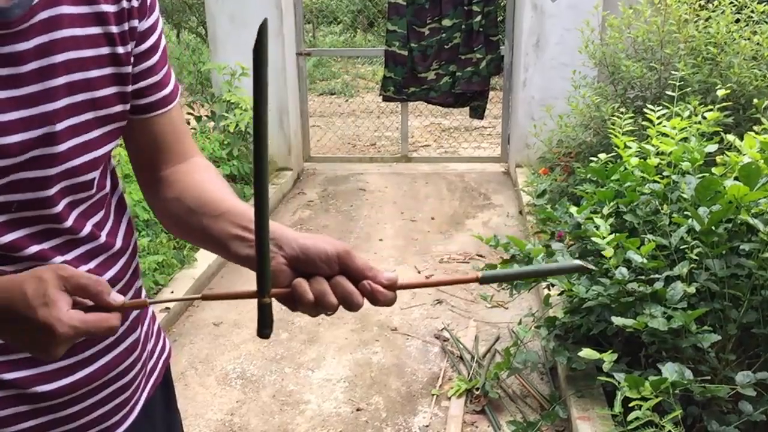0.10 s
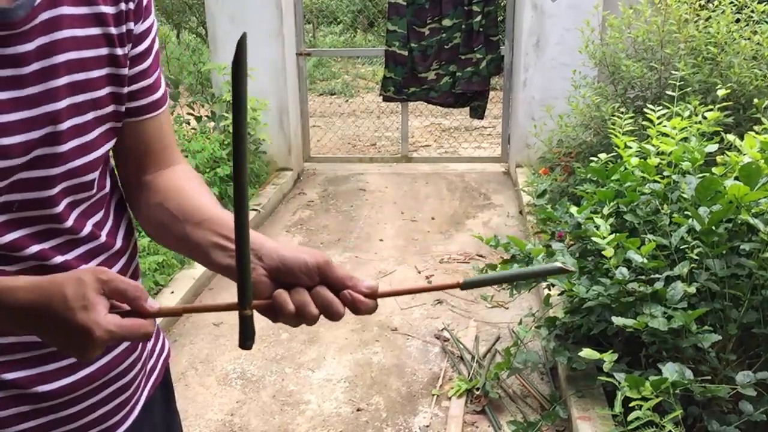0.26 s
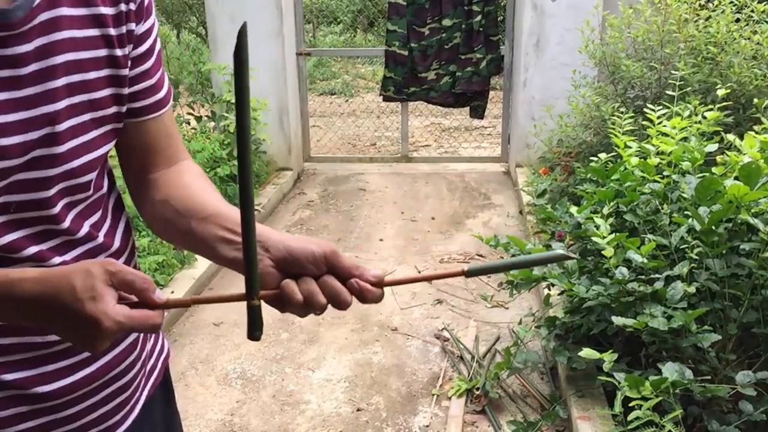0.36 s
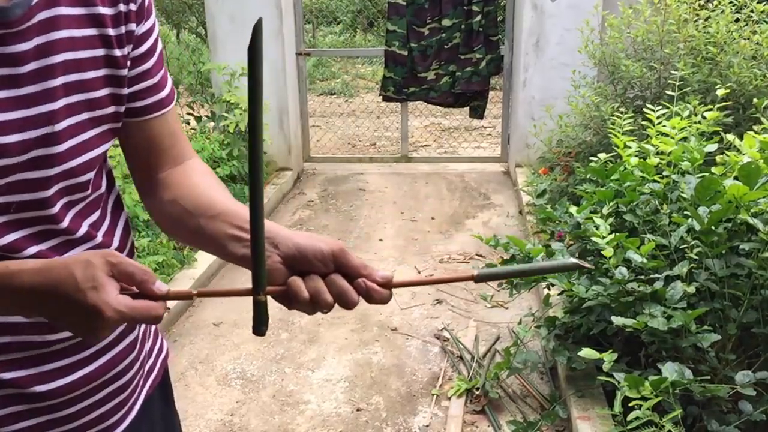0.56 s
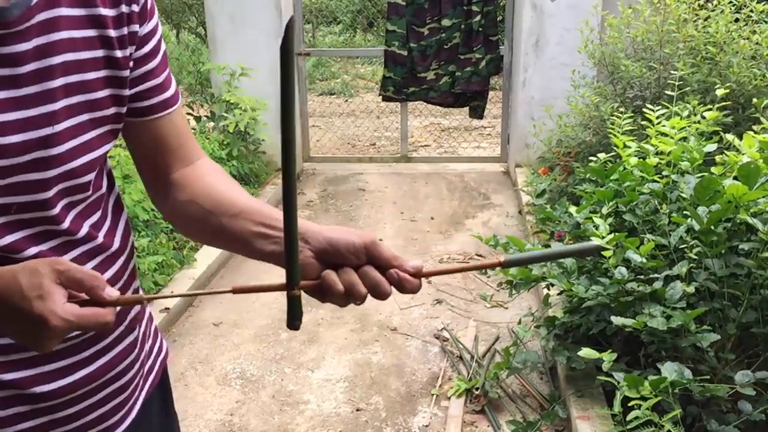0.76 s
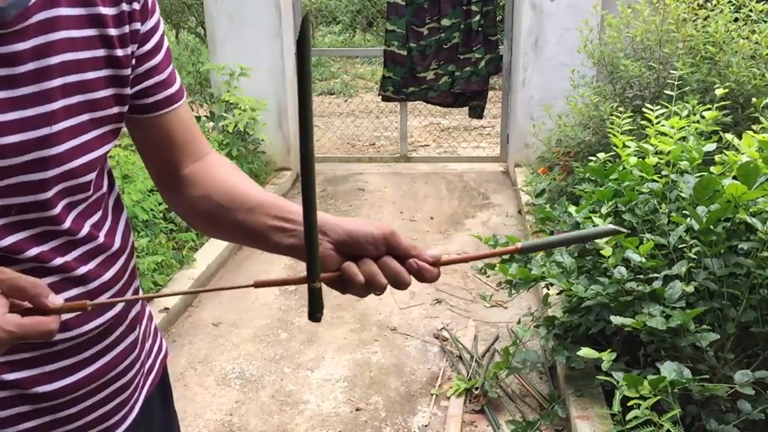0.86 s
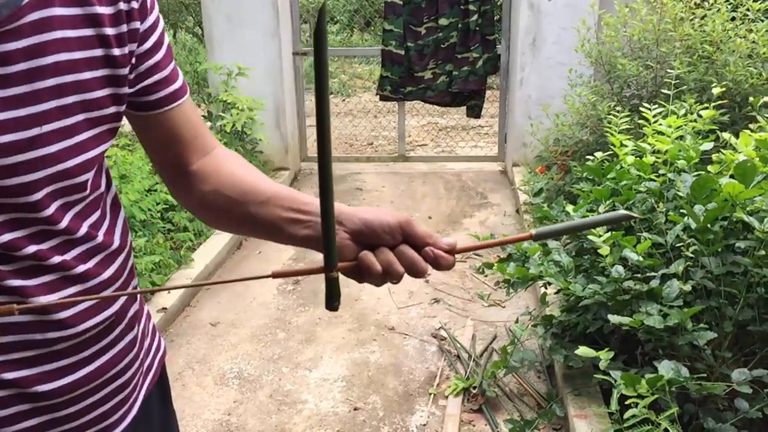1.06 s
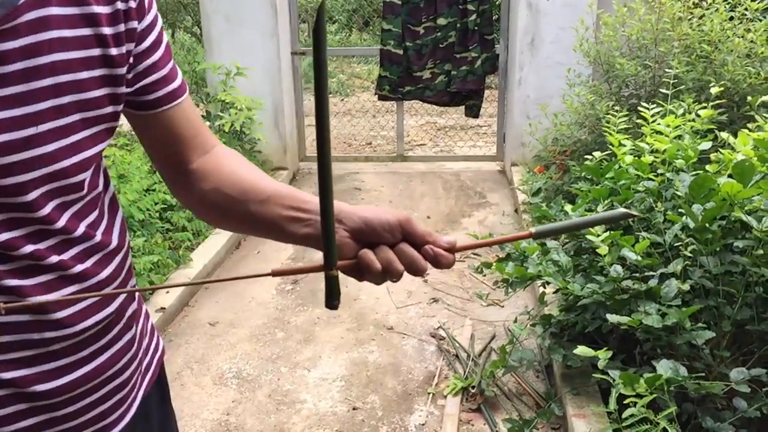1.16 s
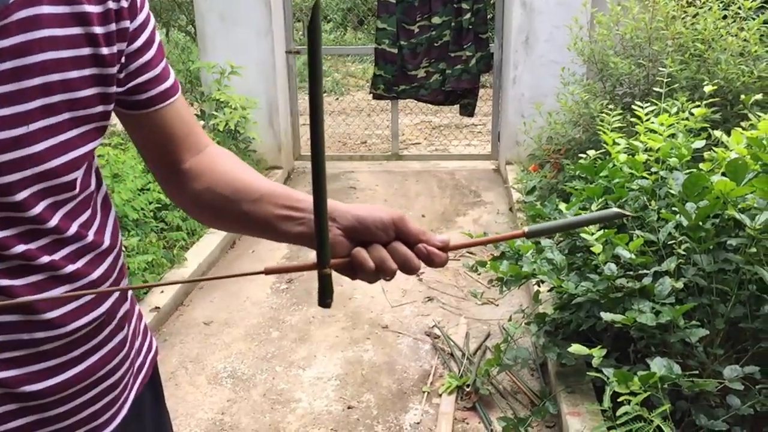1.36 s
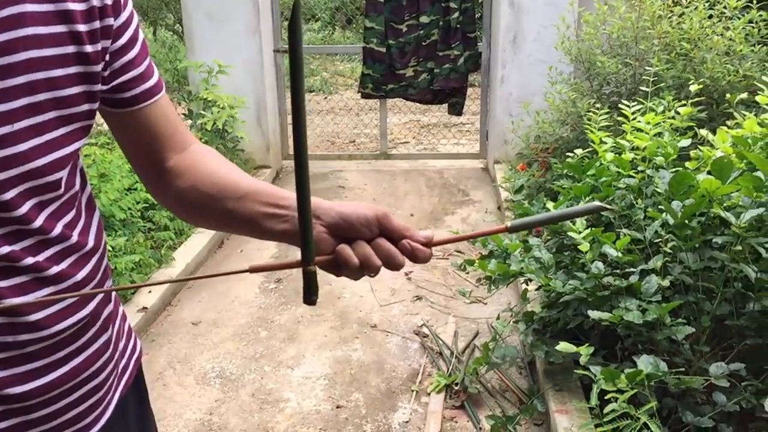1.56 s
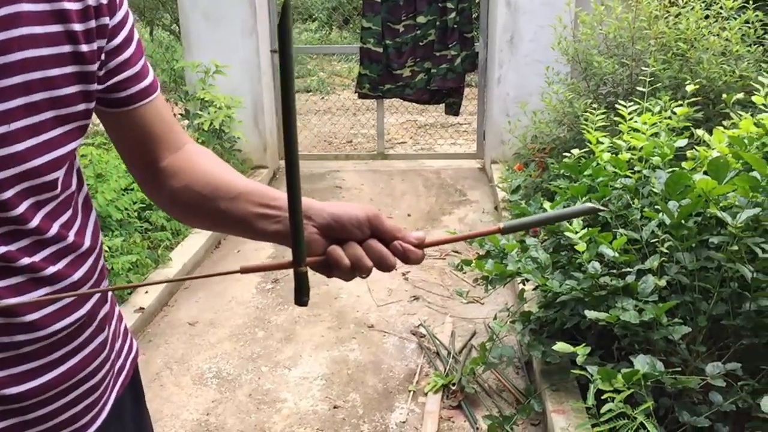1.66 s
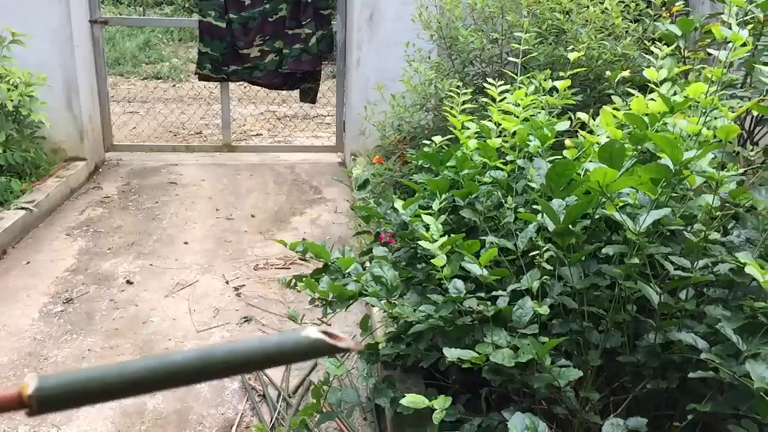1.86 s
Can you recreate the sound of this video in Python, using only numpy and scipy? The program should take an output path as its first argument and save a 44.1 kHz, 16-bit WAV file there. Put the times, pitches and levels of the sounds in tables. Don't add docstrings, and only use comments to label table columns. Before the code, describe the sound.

A bamboo pop gun rubs and creaks faintly, then bangs once, sharp and distorted, close to the microphone; slaps off the walls fade into a garden with thin crickets, soft breeze and a faint nasal plunger scrape.

```python
import sys
import numpy as np
from scipy import signal
from scipy.io import wavfile

SR = 44100
rng = np.random.default_rng(int(sys.argv[2]) if len(sys.argv) > 2 else 0)


def pcm_store(signal):
    levels = np.round(np.clip(np.atleast_2d(signal), -1, 1) * 32767)
    wavfile.write(sys.argv[1], SR, levels.astype(np.int16).T)


def convert_level_to_amplitude(level_db):
    exponent = np.asarray(level_db, float) / 20
    return 10 ** exponent


N = 83790
SHOT_S, CRACK_LEAD_S = .2353, .0007


def rms_one(x):
    return x / np.sqrt(np.mean(x ** 2) + 1e-20)


def butter(x, order, hz, kind="low"):
    return signal.sosfilt(signal.butter(order, hz, kind, fs=SR, output="sos"), x)


def curve(rows):
    return convert_level_to_amplitude(np.interp(np.arange(N) / SR, *np.transpose(rows)))


def at_hz(points, hz, column=1):
    points = np.array(points)
    return np.interp(np.log(hz), np.log(points[:, 0]), points[:, column])


def drift(rate_hz):
    r = np.exp(-80 * np.pi * rate_hz / SR)
    slow = signal.lfilter([1], [1, -2 * r, r * r], rng.standard_normal(N // 40 + 2002))[2000:]
    return np.interp(np.arange(N) / 40, np.arange(len(slow)), rms_one(slow - slow.mean()))


def click(s):
    return 1. * (np.arange(N) == int(s * SR))


def ring(clicks, hz, t60):
    r, w = convert_level_to_amplitude(-60 / (t60 * SR)), 2 * np.pi * hz / SR
    return signal.lfilter([0, np.sin(w)], [1, -2 * r * np.cos(w), r * r], clicks + 1e-18)


def bands(source, table):
    low_hz, high_hz = table[0][0], table[-1][0]
    edges = np.geomspace(low_hz, high_hz, int(3 * np.log2(high_hz / low_hz)) + 1)
    for k, (low, high) in enumerate(zip(edges, edges[1:])):
        yield np.sqrt(low * high), butter(source[k % 2], 2, [low, high], "band")


def coloured(source, spectrum, patchy_db):
    together = drift(1.3)
    out = 0
    for hz, x in bands(source, spectrum):
        flicker_db = patchy_db * (0.36 * together + drift(32))
        out = out + x * convert_level_to_amplitude(at_hz(spectrum, hz) + flicker_db)
    return rms_one(out)


def knocks(rows):
    spread = .12
    out = np.zeros(N)
    for s, db, hz, rise_ms in rows:
        t = np.maximum(np.arange(N) / SR - s, 0)
        u = 1000 * t / rise_ms
        main, *sides = [np.sin(2 * np.pi * hz * (1 + spread * k) * t) for k in (0, 1, -1, 2)]
        out += convert_level_to_amplitude(db) * u * np.exp(1 - u) * (main + .35 * sum(sides))
    return out


# delay in seconds, level in dB, dullness cut in Hz.
BANGS = [
    (0, 11.5, 9000),
    (.0089, 1, 9000),
    (.0177, 4, 6000),
]
# pitch in Hz, level in dB, t60 in seconds.
BARREL = [(354.7, -10, .014), (450.7, -4, .012), (542, -4, .012), (900, -3, .01), (1100, 1.5, .01),
          (1530, -5, .008), (2050, -4, .007)]
# pitch in Hz, level in dB, t60 in seconds.
CRACK = [(4300, 3.5, .004), (8050, -0.5, .003), (13700, -10, .002)]


def bang():
    pulses, fronts = np.zeros(N), np.zeros(N)
    for s, db, hz in BANGS:
        pulses += convert_level_to_amplitude(db) * butter(click(SHOT_S + s), 2, min(hz, .45 * SR))
        fronts += convert_level_to_amplitude(1.8 * (db - BANGS[0][1])) * click(SHOT_S - CRACK_LEAD_S + s)
    body = sum(convert_level_to_amplitude(db) * ring(pulses, hz, t60) for hz, db, t60 in BARREL)
    crack = sum(convert_level_to_amplitude(db) * ring(fronts, hz, t60) for hz, db, t60 in CRACK)
    return butter(body, 6, 320, "high") + crack


def puff():
    start_s, hz, db, t60_s = .2365, 35.2, -11.5, 0.22
    sag_s, sag_tau_s = .009, .004
    t = np.arange(N) / SR - start_s
    sagging = t + sag_s * (1 - np.exp(-np.abs(t) / sag_tau_s))
    tone = convert_level_to_amplitude(db - 60 * np.abs(t) / t60_s) * np.sin(2 * np.pi * hz * sagging) * (t > 0)
    return tone + convert_level_to_amplitude(-14) * ring(click(start_s), 80, .05)


# start in seconds, level in dB, pitch in Hz, rise in ms.
RETURNS = [
    (.2692, -17, 6800, .5),
    (.2700, -18, 4500, .6),
    (.2856, -3, 1020, 1.7),
    (.2885, -13, 600, 2.0),
    (.418, -22, 750, 4.0),
]


def late_returns():
    return knocks(RETURNS)


# band centre in Hz, level in dB per band, t60 in seconds.
TAIL = [(110.3, -42.5, .3), (220, -33.5, 0.28), (350, -20.5, 0.61), (584, -22.5, 0.7), (1100, -13, 0.67),
        (1850, -18.5, 0.69), (3800, -26.5, 0.65), (6600, -32.5, 0.42), (10190, -37.5, .3)]
# time in seconds, level in dB.
WALLS = [(.24, -3), (.262, -1.5), (.268, -2), (.282, -1), (.292, 1), (.30, -3.5), (.35, -1), (.42, 3.5),
         (.5, 1)]


def tail():
    early_db, early_t60_s, onset_s = 7.5, 0.067, 0.0034
    t = np.maximum(np.arange(N) / SR - SHOT_S, 0)
    out = np.zeros(N)
    for hz, x in bands(rng.standard_normal((2, N)), TAIL):
        out += rms_one(x) * convert_level_to_amplitude(at_hz(TAIL, hz) - 60 * t / at_hz(TAIL, hz, column=2))
    early = 1 + convert_level_to_amplitude(early_db - 60 * t / early_t60_s)
    return out * early * np.minimum(t / onset_s, 1) * curve(WALLS)


def creak():
    start_s, db, rise_db_per_s = .2125, -24.5, 699
    t = np.arange(N) / SR
    noise = rms_one(butter(rng.standard_normal(N), 3, (494, 1800), "band"))
    swell = convert_level_to_amplitude(db + rise_db_per_s * np.minimum(t - SHOT_S, 0))
    return noise * swell * (t > start_s) * (t < SHOT_S)


# start in seconds, level in dB, pitch in Hz, rise in ms.
SLIPS = [
    (.0500, -41.5, 6410, 3.0),
    (.1745, -44, 4400, 1.5),
    (.1907, -30.5, 900, .4),
    (.2125, -31.5, 790, 1.0),
    (.2170, -32.5, 1100, 1.0),
    (.2305, -20.5, 1300, 1.5),
    (.935, -58, 8400, 3.0),
    (1.0, -51.5, 1800, 8.0),
]


def slips():
    return knocks(SLIPS)


def rub_grains():
    contacts_per_s = 1700
    return rng.standard_normal((2, N)) * (0.32 + (rng.random((2, N)) < contacts_per_s / SR))


# time in seconds, level in dB.
PUSH = [(0.0, -62), (0.042, -58), (0.052, -55.5), (0.082, -54.5), (0.194, -51), (0.208, -44),
        (0.225, -53.5)]
# frequency in Hz, level in dB per Hz.
PUSH_RUB = [(1300, -8), (1700, -1.5), (2300, -7), (3400, -3), (4600, -3), (6500, -4), (8500, -6.5),
            (11000, -8.5)]


def push():
    stroke = list(PUSH) + [(.235, -54), (.26, -90.5)]
    return convert_level_to_amplitude(6) * curve(stroke) * coloured(rub_grains(), PUSH_RUB, patchy_db=0.5)


# time in seconds, level in dB.
PULL = [(.62, -90.5), (.74, -71.5), (.81, -58.5), (.86, -61.5), (.9, -64), (.97, -58), (1.04, -61.5),
        (1.12, -67.5), (1.22, -76), (1.37, -86.5), (1.65, -78), (1.74, -72), (1.775, -63.5), (1.82, -65),
        (1.83, -70), (1.9, -67)]
# frequency in Hz, level in dB per Hz.
RUB = [(1620, -32), (2750, 4.5), (3230, -9.5), (4070, -19), (5070, -6.5), (7010, -19.5), (8350, -8),
       (9400, -17.5), (12200, -43), (20700, -120)]


def pull():
    stroke = [(.3, -110)] + list(PULL)
    colour = list(RUB[:-2]) + [(11000, RUB[-3][1])]
    return convert_level_to_amplitude(9.5) * curve(stroke) * coloured(rub_grains(), colour, patchy_db=2.0)


# pitch in Hz, level in dB, chirps per second.
CRICKETS = [(2427.3, -47, 13), (2466, -50.5, 22), (2503, -41.5, 28.2), (2466, -49.5, 71), (2545, -41.5, 10),
            (2598, -47.5, 55)]


def cricket(hz, db, per_s, depth, swell_db):
    wobble_hz = 11.0 * hz / CRICKETS[0][0]
    strokes = np.cumsum(per_s * (1 + 0.077 * drift(5.2))) / SR + rng.random()
    pulse = np.maximum(1 + depth * np.cos(2 * np.pi * strokes), 0)
    tone = np.sin(2 * np.pi * np.cumsum(hz + wobble_hz * drift(12)) / SR)
    return convert_level_to_amplitude(db + swell_db * drift(5.7)) * pulse * tone


# time in seconds, level in dB.
CHORUS = [(0, 2.5), (.085, -1), (.11, -2), (.2, 0.5), (.6, 4.5), (.68, 1.5), (.78, -2.5), (.95, 0.5),
          (1.1, -3), (1.2, 2), (1.3, -3.5), (1.4, 2.5), (1.55, -2), (1.7, -1.5), (1.78, 3.5), (1.82, -2.5),
          (1.9, -2.5)]


def crickets():
    near = curve(CHORUS) * sum(cricket(*row, depth=.4, swell_db=1.5) for row in CRICKETS)
    high = cricket(5180, -71, 29.5, depth=2, swell_db=2)
    far = cricket(5450, -73, 39, depth=0.33, swell_db=4)
    return near + high + far


# frequency in Hz, level in dB per Hz.
AIR = [(12, -27.5), (20, 0.5), (194, -13), (344, -21), (403, -17.5), (943, -14), (1100, -15), (2120, -29),
       (2250, -14), (2920, -54), (4950, -120)]
# time in seconds, level in dB.
BREEZE = [(0, -0.5), (.6, 2.5), (.9, 2), (1.1, 0.5), (1.25, 3.5), (1.45, 0), (1.7, -2), (1.9, 3)]


def air():
    return convert_level_to_amplitude(-53) * curve(BREEZE) * coloured(rng.standard_normal((2, N)), AIR, patchy_db=3.0)


def hiss():
    colour = [(2250, 2.5), (4500, -6.5), (11000, -14.5)]   # Hz, dB per Hz
    return convert_level_to_amplitude(-62.5) * coloured(rng.standard_normal((2, N)), colour, patchy_db=1.5)


def scene():
    shot = bang() + puff() + late_returns() + tail()
    gun = creak() + slips() + push() + pull()
    return (shot + gun + crickets() + air() + hiss())[None]


def top_cut(x):
    return signal.sosfilt(signal.butter(12, 16840, fs=SR, output="sos"), x)


def record(dry):
    duck_db, settle_s, hold_to_s, release_s = -9, .18, 0.51, 0.2
    change_s, change_db = 1.8225, -6
    t = np.arange(N) / SR
    duck_times = [SHOT_S, SHOT_S + settle_s, hold_to_s, hold_to_s + release_s]
    x = dry * convert_level_to_amplitude(np.interp(t, duck_times, [0, duck_db, duck_db, 0]))
    dull = signal.sosfilt(signal.ellip(10, .5, 70, 9430, fs=SR, output="sos"), x)
    crack_gate = convert_level_to_amplitude(-60 * np.abs(t - SHOT_S) / .03) * (t > SHOT_S - 2 * CRACK_LEAD_S)
    heard = dull + (x - dull) * crack_gate
    mix = np.clip(heard * convert_level_to_amplitude(change_db * (t > change_s)), -1, 1)
    return top_cut(mix)


dry = scene()
out = record(dry)
pcm_store(out)
```